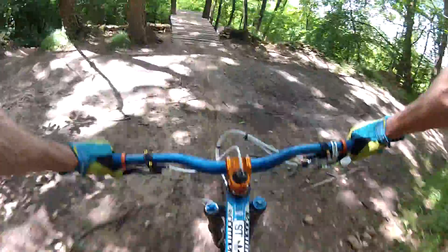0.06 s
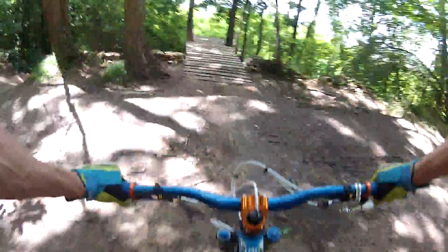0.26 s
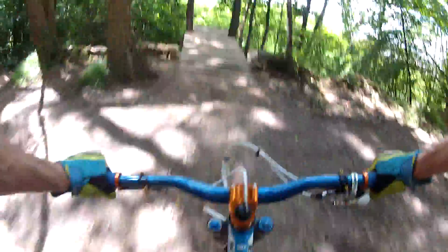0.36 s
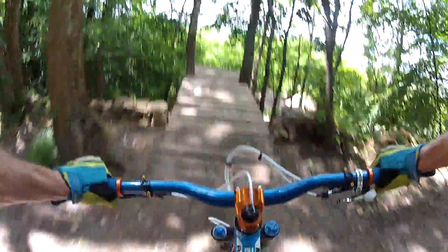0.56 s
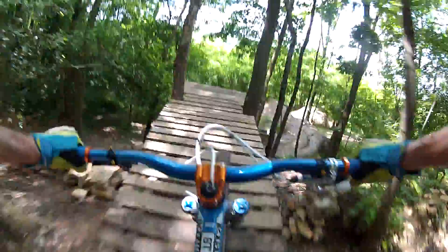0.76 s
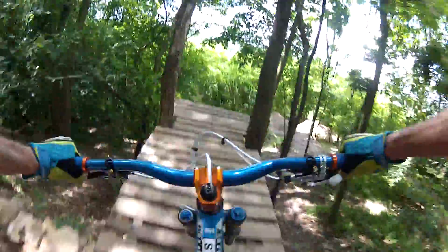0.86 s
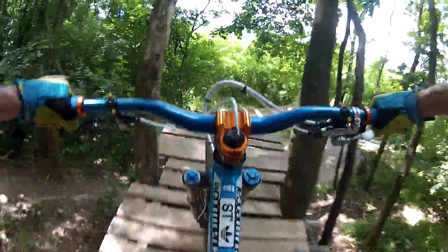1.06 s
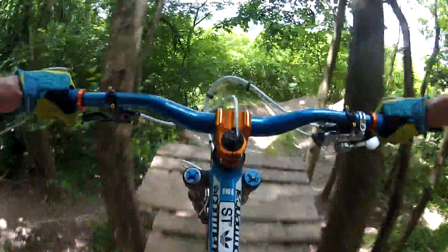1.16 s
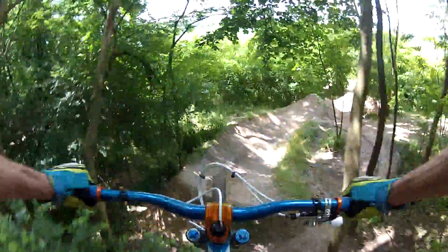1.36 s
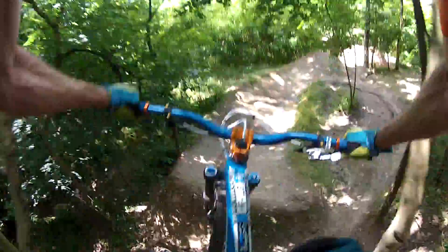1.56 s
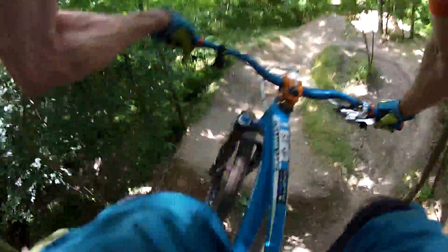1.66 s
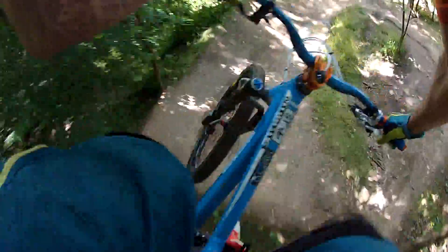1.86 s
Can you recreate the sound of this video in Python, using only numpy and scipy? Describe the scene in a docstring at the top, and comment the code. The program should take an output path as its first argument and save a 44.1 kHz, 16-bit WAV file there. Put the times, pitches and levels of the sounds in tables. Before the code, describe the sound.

A mountain bike rolls over dirt, tyres crunching, with wind rumbling on the rider's microphone throughout. A thump at 0.2 seconds is followed by a sharp plastic clack at 0.4 and the hardest, slightly distorted jolt at 0.55. Wooden planks then drone faintly under the wheels until about 1.4 seconds. Lighter bumps, tyre scuffs and short frame and chain rattles continue to about 1.9 seconds.

```python
"""On a packed dirt trail and up a plank ramp, a mountain bike is heard from a camera on the rider's chest.
Grit crunches under the tyres, the frame and chain rattle, the wheels bump and the planks drone.
Jolts thump the camera housing, its plastic mount clacks, and wind rumbles over it.
The hardest jolt overloads the recorder, which also mirrors the low range faintly into the treble."""
import sys
import numpy as np
from scipy import signal
from scipy.fft import rfft, irfft
from scipy.io import wavfile

SR = 44100
rng = np.random.default_rng(int(sys.argv[2]) if len(sys.argv) > 2 else 0)


def output_pcm(signal):
    """Save a mono or channel-first signal as 16-bit PCM at the path in sys.argv[1].

    Samples are clipped to [-1, 1] before scaling.
    """
    pcm = np.clip(np.atleast_2d(signal).T, -1, 1) * 32767
    wavfile.write(sys.argv[1], SR, np.round(pcm).astype(np.int16))


N = 83790

# rolling noise: (time [s], relative level [dB])
ROLL_LEVEL = [(0.0, -62.5), (0.13, -56), (0.282, -52), (0.392, -53), (0.622, -56), (0.962, -62.5),
              (1.234, -60), (1.534, -55.5), (1.712, -64), (1.88, -58.5)]
# tyres heard through the housing: (frequency [Hz], relative density [dB])
ROLL_SPECTRUM = [(100, -1.5), (400, 3), (750, -0.5), (1100, 2), (1600, -3), (2080, 5), (2900, -15),
                 (3550, 3.5), (3900, -2), (4400, -32), (6000, -28), (9000, -20.5), (15000, -50)]
# tyre scuffs: (peak time [s], level [dB], half-width [s])
SCUFFS = [(.232, -52, 0.012), (.382, -31, 0.00059), (.5298, -44, 0.0024), (.546, -34, 0.0042),
          (.554, -37, 0.0027), (.699, -41.5, 0.0066), (.768, -51.5, 0.012), (.843, -44.5, 0.0073),
          (1.297, -47.5, .015), (1.352, -53.5, 0.023), (1.391, -48.5, 0.0026), (1.52, -54.5, 0.019),
          (1.547, -45, 0.0058), (1.679, -52, 0.028), (1.747, -53.5, 0.014)]
# scuffing noise: (frequency [Hz], relative density [dB])
SCUFF_SPECTRUM = [(150, 2), (420, -3), (600, -4), (950, 4), (1250, -1), (1600, -12), (2050, 2.5),
                  (2900, -18.5), (3550, -4.5), (4000, -14), (4500, -27.5), (7000, -28), (15000, -46)]
def tyres():
    """Contact noise: many tiny impacts of grit merge into a crunch, louder where the tyres scuff."""
    rolling = amp(0.5) * grit(ROLL_SPECTRUM) * level(ROLL_LEVEL)
    scuffing = grit(SCUFF_SPECTRUM) * swells(SCUFFS)
    return rolling + scuffing


# wheel bumps: (onset [s], level [dB], frequency [Hz], t60 [s])
BUMPS = [(.217, -25, 116, 0.11), (.234, -23.5, 344, 0.013), (.329, -28, 113, .06),
         (.386, -11.5, 181, 0.051), (0.5372, -6, 74.5, 0.019), (0.544, -4.5, 150, 0.035),
         (0.546, -27.5, 405, 0.046), (.545, -25, 822, 0.036), (.689, -27.5, 159, 0.084),
         (.693, -32, 430, 0.033), (.776, -34.5, 331, 0.023), (0.831, -13.5, 130.7, 0.042),
         (.931, -26.5, 370, 0.013), (1.045, -23, 73, 0.16), (1.444, -28, 313, 0.017),
         (1.769, -30.5, 117.7, 0.13)]
def wheel_bumps():
    """Damped free vibration: each bump of a wheel rings one hollow mode."""
    return sum(ring(*row, rise=0.0027) for row in BUMPS)


# camera jolts: (onset [s], peak level [dB], duration [s], evenness [1 = even, less = sharper push])
JOLTS = [(.202, -12.5, 0.054, 0.88), (0.373, -15, 0.058, 0.65), (0.5443, 1, 0.032, 0.495),
         (0.686, -13.5, 0.048, .7), (.829, -21, 0.084, 0.59), (1.059, -21, 0.038, 0.9),
         (1.308, -21, 0.071, 0.77), (1.368, -25.5, 0.063, 0.84), (1.472, -17.5, 0.0382, 0.85),
         (1.521, -27, 0.049, 0.75), (1.646, -31, 0.033, 1), (1.736, -34, 0.048, 0.91),
         (1.885, -19.5, 0.034, 0.69)]
def jolt(start, db, length, evenness):
    """Shock response: the housing thumps with a push, a swing back and a return, slower if uneven."""
    cycles, punch, smoothing_s = 1.5, 0.917, 0.0048
    progress = np.clip((clock() - start) / length, 1e-6, 1)
    swing = progress ** evenness
    early_emphasis = progress ** (punch * (evenness - 1))
    push = np.sin(np.pi * swing) * np.sin(2 * np.pi * cycles * swing) * early_emphasis
    push = signal.oaconvolve(push, signal.windows.hann(round(smoothing_s * SR)), "same")
    return amp(db) * push / (abs(push).max() + 1e-12)


# strikes of the mount: (onset [s], gain [dB])
CLACKS = [(0.3851, 4), (0.5521, -18.5)]
# modes of the mount: (frequency [Hz], relative level [dB], t60 [s])
MOUNT_MODES = [(398, -27, 0.02), (616, -20.5, 0.028), (820, -16.5, 0.016), (1148, -19.5, 0.016),
               (1460, -26.5, 0.013), (1866, -18.5, 0.025), (2142, -6, 0.014), (2324, -23, 0.013),
               (3300, -29, 0.01)]
# crack of contact: (frequency [Hz], relative density [dB])
CRACK_SPECTRUM = [(150, 7.5), (700, 13), (1300, 1), (1600, 15.5), (2250, -2), (2700, -2), (3700, -8),
                  (5000, -30), (15000, -27)]
def mount_clack(start, db):
    """Impact excitation: the mount hits its stop with a crack, and its modes ring in alternating sign."""
    crack_db, crack_rise_s, crack_t60_s = -20.5, 0.00067, 0.014
    t = clock() - start
    envelope = np.clip(t / crack_rise_s, 0, 1) * np.exp(-np.log(1000) * abs(t) / crack_t60_s)
    crack = amp(crack_db) * noise(CRACK_SPECTRUM) * envelope
    modes = sum((-1) ** k * ring(start, mode_db, hz, t60, rise=0.0017)
                for k, (hz, mode_db, t60) in enumerate(MOUNT_MODES))
    return amp(db) * (crack + modes)


# bursts of frame and chain: (peak time [s], level [dB], half-width [s])
RATTLES = [(.2665, -44, .003), (.948, -46, 0.0039), (1.2825, -47, 0.0016), (1.298, -46, 0.011),
           (1.515, -50, 0.0044), (1.548, -64, 0.0062), (1.6515, -47, 0.0036), (1.71, -55.5, 0.055),
           (1.7468, -45, .002)]
# frame resonances: (frequency [Hz], relative density [dB])
FRAME_SPECTRUM = [(300, -20), (1500, 3), (2100, 10.5), (2800, -5), (3550, 10.5), (3900, 7), (4500, -17),
                  (6200, -17.5), (8300, -9), (15000, -41)]
# ticks of the chain: (peak time [s], level [dB], half-width [s])
TICKS = [(.044, -59.5, .003), (.101, -54.5, 0.0024), (.124, -58, 0.0032), (.236, -56.5, 0.012),
         (.324, -54, 0.0038), (.947, -58, 0.0021), (.995, -57, 0.0021), (1.423, -50.5, .006),
         (1.44, -57, 0.015), (1.651, -72, 0.0013), (1.675, -59, 0.012), (1.755, -64, 0.037)]
# bright tone of the ticks: (frequency [Hz], relative density [dB])
TICK_SPECTRUM = [(300, -44), (1500, 12), (3700, 6.5), (5000, 6.5), (6200, -2), (8300, 5), (10000, -28),
                 (15000, -25)]
def rattles():
    """Resonance: frame and chain shake in short metallic bursts, and the chain ticks brightly between them."""
    return grit(FRAME_SPECTRUM) * swells(RATTLES) + grit(TICK_SPECTRUM) * swells(TICKS)


# drone of the ramp: (time [s], level [dB])
PLANK_LEVEL = [(0, -71), (.55, -59), (.68, -50.5), (.85, -57), (1.05, -56), (1.24, -53.5), (1.45, -66),
               (1.65, -79), (1.9, -81)]
# hollow response of the boards: (frequency [Hz], relative density [dB])
PLANK_SPECTRUM = [(60, -10), (180, 3), (280, -1), (390, -1.5), (520, -11), (900, -18.5), (1500, -13),
                  (5000, -58)]
def planks():
    """Forced vibration: the boards of the ramp drone while the wheels are on them."""
    return noise(PLANK_SPECTRUM) * level(PLANK_LEVEL)


# gusts: (time [s], level [dB])
WIND_LEVEL = [(0, -42.5), (.17, -36.5), (.3, -31), (.47, -39.5), (.62, -34), (.78, -35.5), (.98, -41),
              (1.2, -40.5), (1.35, -36.5), (1.6, -40.5), (1.76, -35), (1.87, -39)]
# wind rumble: (frequency [Hz], relative density [dB])
WIND_SPECTRUM = [(8, -31.5), (26, 8), (45, -10), (70, -11.5), (110, -13), (180, -16.5), (260, -36.5),
                 (500, -66), (1500, -84)]
# rush of air: (frequency [Hz], relative density [dB])
AIR_SPECTRUM = [(100, 9), (330, 3), (600, -22), (1000, -28), (2400, -4), (3800, -19), (4600, -16.5),
                (6000, -26.5), (9000, -23), (15000, -43.5)]
def wind():
    """Flow noise: wind rumbles unevenly on the housing over a steady rush of air."""
    return noise(WIND_SPECTRUM) * level(WIND_LEVEL) + amp(-58) * noise(AIR_SPECTRUM)


def amp(db):
    """Decibel law: 20 dB is a factor of ten in amplitude."""
    return 10 ** (np.asarray(db) / 20)


def unit(x):
    """Normalisation to rms 1."""
    return x / np.sqrt(np.mean(x ** 2) + 1e-20)


def clock():
    """Uniform sampling: the time of each sample in seconds."""
    return np.arange(N) / SR


def level(points):
    """Amplitude envelope through (time [s], level [dB]) points."""
    return amp(np.interp(clock(), *np.transpose(points)))


def colour(x, points):
    """Linear filtering by a (frequency [Hz], gain [dB]) curve."""
    hz, db = np.transpose(points)
    log_hz = np.log(np.fft.rfftfreq(N, 1 / SR) + 1)
    return irfft(rfft(x) * amp(np.interp(log_hz, np.log(hz), db)), N)


def noise(spectrum):
    """Gaussian noise of rms 1 with the given spectrum."""
    return unit(colour(rng.standard_normal(N), spectrum))


def grit(spectrum):
    """Shot noise: dense clicks of uneven size over a hiss, filtered and scaled to rms 1."""
    clicks_per_s, spread_db, click_share = 1400, 1.5, 0.76
    size = amp(spread_db * np.minimum(rng.exponential(1, N), 4))
    clicks = size * rng.choice([-1, 1], N) * (rng.random(N) < clicks_per_s / SR)
    hiss = np.sqrt(1 - click_share) * rng.standard_normal(N)
    return unit(colour(np.sqrt(click_share) * unit(clicks) + hiss, spectrum))


def swells(rows):
    """Incoherent addition: an envelope of Gaussian swells summed in power."""
    return np.sqrt(sum(amp(db) ** 2 * np.exp(-((clock() - peak) / half) ** 2) for peak, db, half in rows))


def ring(start, db, hz, t60, rise):
    """Exponential decay of one mode, its onset softened by a time constant of `rise` seconds."""
    t = np.maximum(clock() - start, 0)
    envelope = (1 - np.exp(-t / rise)) * np.exp(-np.log(1000) * t / t60)
    return amp(db) * envelope * np.sin(2 * np.pi * hz * t)


def scene():
    """Superposition: all sources add in mono at the camera, the left channel 0.05 dB louder."""
    thumps = sum(jolt(*row) for row in JOLTS) + wheel_bumps()
    mono = tyres() + planks() + rattles() + wind() + thumps
    mono += sum(mount_clack(*row) for row in CLACKS)
    return np.array([mono * amp(0.05), mono])


# weighting of the treble images: (frequency [Hz], gain [dB])
MIRROR_GAIN = [(8200, 4), (9800, 2), (12000, 1), (14200, 0.5), (15500, -4)]
def mirror(x):
    """Spectral imaging: holding the low range in steps mirrors it around the hold frequency."""
    hold_hz, low_range_hz = 12000, 4100
    low = signal.oaconvolve(x, signal.firwin(201, low_range_hz, fs=SR), "same")
    slope = np.gradient(low) * SR / (2 * np.pi * hold_hz) * signal.windows.tukey(N, 0.01)
    sidebands = 2 * slope * np.sin(2 * np.pi * hold_hz * clock())
    return colour(sidebands, MIRROR_GAIN)


def record(dry):
    """Saturation: the sound and its treble images are hard-limited at full scale, then low-passed."""
    limited = np.clip(dry + mirror(dry.mean(0)), -1, 1)
    low_pass = signal.firwin(511, cutoff=15450, window=("kaiser", 9), fs=SR)
    return signal.oaconvolve(limited, low_pass[None], "same")


dry = scene()
out = record(dry)
output_pcm(out)
```